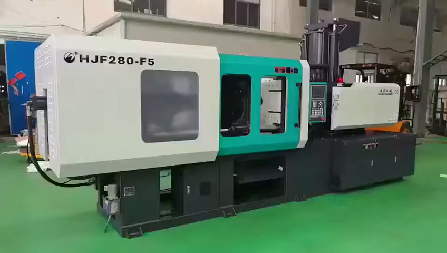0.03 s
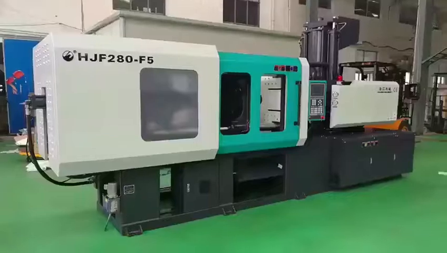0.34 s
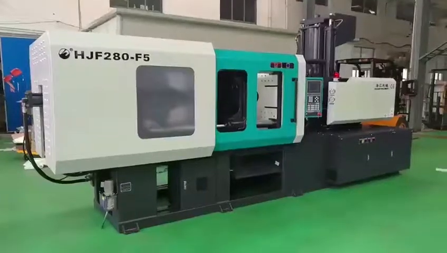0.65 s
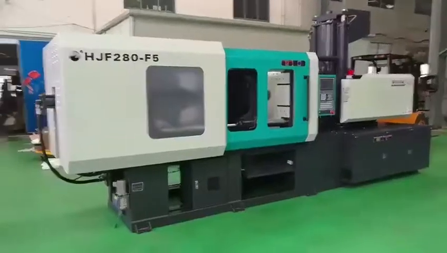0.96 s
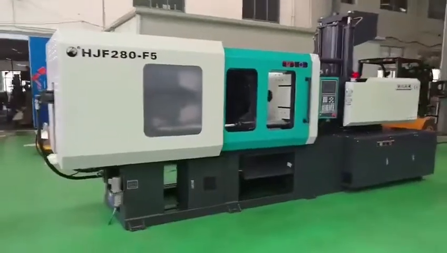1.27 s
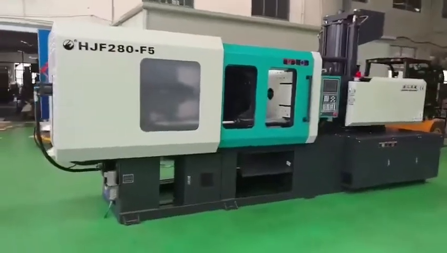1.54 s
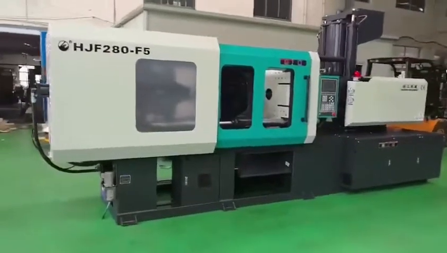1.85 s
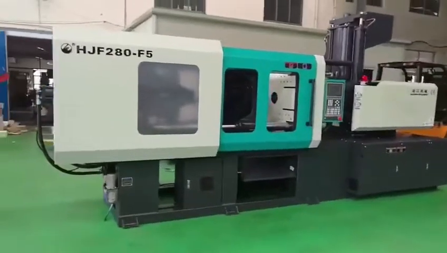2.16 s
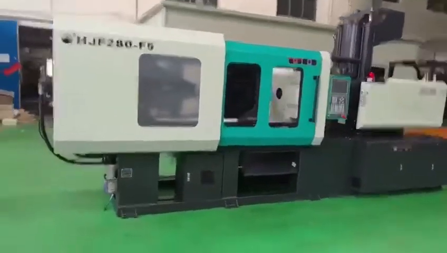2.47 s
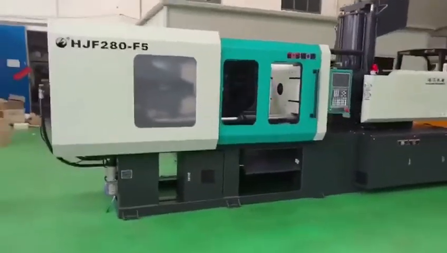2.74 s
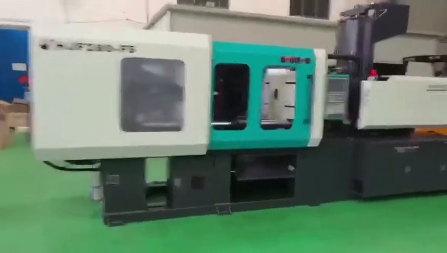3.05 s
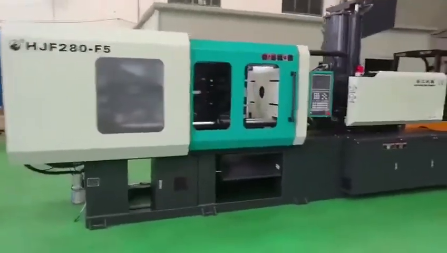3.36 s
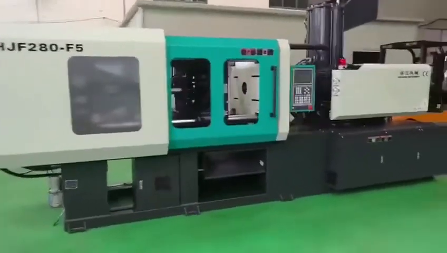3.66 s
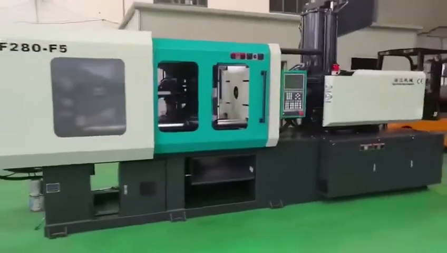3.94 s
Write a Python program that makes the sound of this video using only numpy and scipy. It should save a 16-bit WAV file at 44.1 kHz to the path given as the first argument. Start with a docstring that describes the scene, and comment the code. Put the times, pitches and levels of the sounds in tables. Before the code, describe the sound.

A large factory machine runs throughout with a wavering hum, low rumble and dense, hissing fan roar. Distant clatter and brief metal squeaks sound in the hall, followed by soft handling bumps on the moving microphone.

```python
"""A factory hall with an idling injection moulding machine, heard in mono from a hand-held microphone.
The pump hums near 400 Hz, swelling and fading as the microphone moves through the hall's standing waves,
over a motor drone and the roar of fans in steel panels. Faint clatter and squeaks come from far off,
low hall resonances ring up briefly, and a few soft handling bumps reach the microphone."""
import sys
import numpy as np
from scipy import signal
from scipy.fft import rfft, irfft, next_fast_len
from scipy.io import wavfile
from scipy.ndimage import uniform_filter1d, map_coordinates

SR = 44100
rng = np.random.default_rng(int(sys.argv[2]) if len(sys.argv) > 2 else 0)


def master_out(mix):
    """Clip the mix to full scale and print it as 16-bit PCM to the path in sys.argv[1]."""
    frames = np.transpose(np.atleast_2d(mix))
    ceiling = np.clip(frames, -1, 1)
    pcm = np.round(ceiling * 32767).astype(np.int16)
    wavfile.write(sys.argv[1], SR, pcm)


N = 176400
TIME_S = np.arange(N) / SR


def amp(db):
    """Decibels to gain."""
    return 10 ** (np.asarray(db) / 20)


def unit(x):
    """Scale to rms 1."""
    return x / np.sqrt(np.mean(np.abs(x) ** 2) + 1e-20)


def along(points, hz):
    """Interpolate (Hz, value) points on a log axis."""
    f, v = np.transpose(points)
    return np.interp(np.log(hz + 1), np.log(f + 1), v)


def curve(points):
    """Interpolate (s, value) points to one value per sample."""
    return np.interp(TIME_S, *np.transpose(points))


def wobble(knots_per_s):
    """Smooth random curve."""
    return map_coordinates(rng.standard_normal(2048), [TIME_S * knots_per_s], mode="wrap")


def filtered(x, response):
    """Zero-phase filter with gain response(hz)."""
    size = next_fast_len(N + SR // 2)
    hz = np.fft.rfftfreq(size, 1 / SR)
    return irfft(rfft(x, size) * response(hz), size)[:N]


def rush(spectrum, patchy_db):
    """Coloured noise of rms 1 whose bands dip briefly at random."""
    bands = signal.stft(rng.standard_normal(N), nperseg=512)[2]
    patches = uniform_filter1d(rng.standard_normal(bands.shape), size=5, axis=0)
    patches = unit(uniform_filter1d(patches, size=6, axis=1))
    dips_db = -2 * patchy_db * np.exp(patches / 2)
    noise = signal.istft(bands * amp(dips_db), nperseg=512)[1][:N]
    return unit(filtered(noise, lambda hz: amp(along(spectrum, hz))))


def fuzzy_line(hz, width_hz):
    """Tone of rms 1, smeared over a narrow band by drifting level and phase."""
    drift = wobble(width_hz) + 1j * wobble(width_hz)
    return unit((drift * np.exp(2j * np.pi * hz * TIME_S)).real)


# Pump tone along the microphone's path: t/s, level/dB
PUMP_TONE_DB = [(0.22, -52), (0.28, -33), (0.35, -53.5), (0.48, -32.5), (0.54, -49), (0.61, -35),
                (0.68, -42), (0.76, -35), (0.85, -39.5), (0.92, -34.5), (1.01, -54), (1.1, -32),
                (1.17, -30), (1.28, -37), (1.36, -35), (1.56, -39.5), (1.65, -33), (1.79, -38.5),
                (1.89, -34.5), (1.94, -41), (2.0, -38.5), (2.13, -42.5), (2.2, -34.5), (2.32, -32),
                (2.41, -52), (2.47, -36), (2.62, -31), (2.84, -47), (2.96, -32), (3.08, -41.5), (3.22, -30),
                (3.32, -38.5), (3.4, -58), (3.51, -32.5), (3.6, -40.5), (3.69, -34), (3.83, -53.5),
                (3.96, -32)]


def pump(hz=402.1, wander_hz=1.3, trim_db=-0.43):
    """Wandering hum, swelling and fading through standing waves, with a narrow noise skirt."""
    pitch_hz = hz + wander_hz * wobble(9)
    tone = unit(np.sin(2 * np.pi * np.cumsum(pitch_hz) / SR))
    skirt = amp(-47) * fuzzy_line(hz=411, width_hz=12)
    return amp(curve(PUMP_TONE_DB) + trim_db) * tone + skirt


# Motor drone: t/s, level/dB
MOTOR_DRONE_DB = [(0.3, -42), (0.7, -48), (0.9, -38.5), (1.15, -52), (1.25, -43), (1.5, -39.5), (1.56, -52),
                  (1.87, -39), (2.3, -48), (2.6, -46.5), (3.0, -46), (3.22, -37), (3.4, -41), (3.57, -37),
                  (3.7, -34.5), (3.82, -45), (3.92, -35.5), (4.0, -34)]
# Low rumble: t/s, level/dB
RUMBLE_DB = [(0.3, -38), (0.5, -39), (0.9, -36), (1.1, -37), (1.38, -36), (1.56, -37.5), (1.87, -37.5),
             (2.1, -39), (2.6, -41.5), (2.75, -34.5), (3.15, -35), (3.55, -34.5), (3.77, -36),
             (3.92, -40.5), (4.0, -36.5)]
# Rumble spectrum: f/Hz, relative density/dB
RUMBLE_SPECTRUM = [(20, -16.5), (35, -10), (60, -11.5), (100, -11), (140, -1), (210, -2.5), (320, -2.5),
                   (385, -1.5), (440, -6), (490, -17), (900, -54.5)]


def motor():
    """Rough drone over a broad rumble."""
    drone = amp(curve(MOTOR_DRONE_DB)) * fuzzy_line(hz=167, width_hz=20)
    rumble = amp(curve(RUMBLE_DB)) * rush(RUMBLE_SPECTRUM, patchy_db=1)
    return drone + rumble


def reflections(x, count=7, gain=.22, first_s=.002, spread_s=.016):
    """Floor and panels add weak copies whose delays drift as the microphone moves; sum at rms 1."""
    n = np.arange(N)
    out = x.copy()
    for k, (place, speed) in enumerate(rng.random((count, 2))):
        drift_s_per_s = .0012 * (-1) ** k * (speed + .5)
        middle_delay_s = first_s + spread_s * (k + place) / count
        delay_s = middle_delay_s + drift_s_per_s * (n - N / 2) / SR
        out += gain * map_coordinates(x, [n - delay_s * SR], order=1, mode="wrap")
    return unit(out)


# Fan roar: t/s, level/dB
FAN_ROAR_DB = [(0.25, -31), (0.34, -32.5), (0.42, -35), (0.5, -32), (0.9, -33), (1.2, -33), (1.36, -31.5),
               (1.53, -33), (1.65, -32.5), (1.75, -34), (1.9, -32), (2.1, -34), (2.38, -32), (2.75, -32.5),
               (2.92, -33.5), (3.3, -31.5), (3.45, -33), (4.0, -32)]
# Roar spectrum: f/Hz, relative density/dB
ROAR_SPECTRUM = [(100, -27.5), (350, -2.5), (470, -7), (570, -0.5), (680, -7.5), (800, -3), (1020, -2.5),
                 (1110, 3), (1240, -0.7), (1390, 0), (1500, -4.5), (1620, -0.5), (1730, 0.5), (1810, 0),
                 (1920, -2.5), (2080, -6.5), (2270, -3), (2450, -7), (2650, -8.5), (3000, -5), (3400, -5.5),
                 (3850, -11.5), (4600, -12), (5600, -22), (7500, -36)]
# Fan hiss: t/s, level/dB
FAN_HISS_DB = [(0.3, -42), (0.43, -45), (0.65, -44.5), (1.0, -42), (1.38, -41.5), (1.75, -44), (2.1, -44),
               (2.45, -44), (3.05, -44), (3.4, -43), (3.9, -41.5)]
# Hiss spectrum: f/Hz, relative density/dB
HISS_SPECTRUM = [(1800, -38), (3200, -13.5), (4400, -7), (5600, 0.5), (7500, -4.5)]
# Machine whines: f/Hz, rms level/dB
WHINE_LINES = [(271, -52), (330, -53.5), (497, -58), (568, -58), (604, -60.5), (1088, -53), (1122, -54),
               (1215, -57), (1320, -59), (1372, -57.5), (1708, -53.5), (1740, -54.5), (1915, -52.5)]


def fans():
    """Fluttering air noise coloured by the panels, with flickering hiss and faint whines."""
    roar = amp(curve(FAN_ROAR_DB)) * reflections(rush(ROAR_SPECTRUM, patchy_db=1.35))
    flicker_db = .9 * wobble(60)
    hiss = amp(curve(FAN_HISS_DB) + flicker_db) * reflections(rush(HISS_SPECTRUM, patchy_db=1.9))
    whines = sum(amp(db) * fuzzy_line(hz, width_hz=10) for hz, db in WHINE_LINES)
    flutter_db = .8 * wobble(30)
    return amp(flutter_db) * (roar + hiss) + whines


# Far knocks: t/s, level/dB, centre f/Hz
FAR_KNOCKS = [(0.605, -43.5, 4520), (0.77, -36.5, 2390), (1.30, -34, 520), (1.355, -47.5, 4300),
              (1.485, -37, 2800), (1.63, -38, 570), (2.72, -36.5, 590), (2.821, -33, 1286),
              (3.301, -38.5, 633), (3.62, -39, 620)]


def clatter(rise_s=.0018, t60_s=.49, sigma_oct=.58):
    """Far knocks, smeared by the hall into soft, dying bands of reverberation."""
    out = np.zeros(N)
    for at_s, db, centre_hz in FAR_KNOCKS:
        age_s = np.maximum(TIME_S - at_s, 0)
        bandpass = lambda hz: np.exp(-.5 * (np.log2((hz + 1) / centre_hz) / sigma_oct) ** 2)
        band = unit(filtered(rng.standard_normal(N), bandpass))
        rise = 1 - np.exp(-age_s / rise_s)
        out += band * rise * amp(db - 60 * age_s / t60_s)
    return out


# Handling bumps: t/s, swing peak/dB, sigma/s
HANDLING_BUMPS = [(0.851, -35, 0.0025), (1.83, -36, 0.0027), (1.934, -22, 0.0013), (2.136, -23.5, 0.0014),
                  (2.4428, -20, 0.0013), (2.534, -40, .002), (2.823, -34, 0.0042), (2.952, -26, 0.0012),
                  (3.0575, -17, 0.0009)]


def handling(tick_db=-12):
    """Each bump pushes the microphone and lets it swing back, with a casing tick and no ringing."""
    out = np.zeros(N)
    casing_noise = rush(ROAR_SPECTRUM, patchy_db=4)
    for at_s, db, sigma_s in HANDLING_BUMPS:
        u = (TIME_S - at_s) / sigma_s
        swing = -u * np.exp((1 - u * u) / 2)
        tick = amp(tick_db) * casing_noise * np.exp(-u * u)
        out += amp(db) * (swing + tick)
    return out


# Hall resonances: t/s, f/Hz, peak/dB, sigma/s
HALL_BOOMS = [(0.91, 169.9, -28, 0.0092), (2.758, 285, -43.5, 0.036), (3.149, 315.7, -31, 0.049),
              (3.164, 616, -34, 0.015), (3.28, 277.6, -33.5, 0.039), (3.317, 568, -36, .025),
              (3.705, 165, -29, 0.018), (3.76, 271, -37, 0.03), (3.983, 342, -34, 0.022)]


def booms():
    """Single low resonances of the hall swell and sink again."""
    out = np.zeros(N)
    for at_s, hz, db, sigma_s in HALL_BOOMS:
        swell = np.exp(-.5 * ((TIME_S - at_s) / sigma_s) ** 2)
        out += amp(db) * swell * np.sin(2 * np.pi * (hz * TIME_S + rng.random()))
    return out


# Metal squeaks: t/s, middle f/Hz, peak/dB, sigma/s
METAL_SQUEAKS = [(1.486, 1750, -26.5, .007), (1.525, 1330, -36, .015), (1.568, 1300, -30, .014)]


def squeaks(fall_oct_per_sigma=.04, rough_rad=.3):
    """Far metal squeaks, each one rough tone that swells and fades while sliding down."""
    out = np.zeros(N)
    for at_s, hz, db, sigma_s in METAL_SQUEAKS:
        u = np.clip((TIME_S - at_s) / sigma_s, -6, 6)
        pitch_hz = hz * 2 ** (-fall_oct_per_sigma * u)
        phase = 2 * np.pi * np.cumsum(pitch_hz) / SR + rough_rad * wobble(200)
        out += amp(db) * np.exp(-.5 * u ** 2) * np.sin(phase)
    return out


def scene():
    """Machine, hall and bumps, the same in both channels."""
    mono = pump() + motor() + fans() + clatter() + handling() + booms() + squeaks()
    return np.array([mono, mono])


def record(dry):
    """The sound cuts in, fades up and is band-limited."""
    start_s, fade_s, fade_from_db, top_hz = .12, .2, -10.5, 7650
    since_s = TIME_S - start_s
    gain = (since_s > 0) * amp(fade_from_db * np.clip(1 - since_s / fade_s, 0, 1))
    lowpass = lambda hz: np.clip((top_hz - hz) / 100 + .5, 0, 1)
    return np.array([filtered(channel * gain, lowpass) for channel in dry])


dry = scene()
out = record(dry)
master_out(out)
```